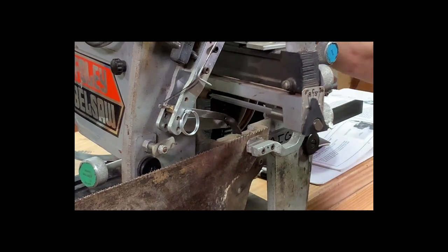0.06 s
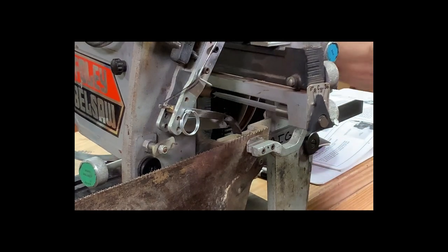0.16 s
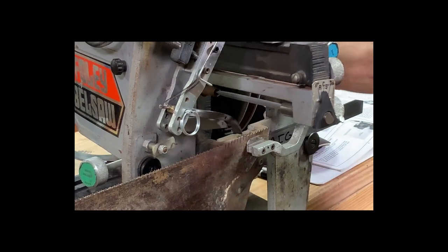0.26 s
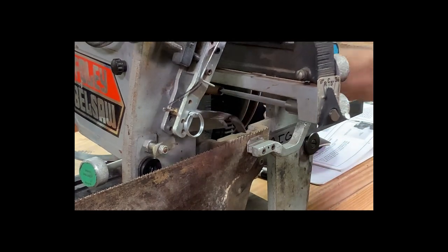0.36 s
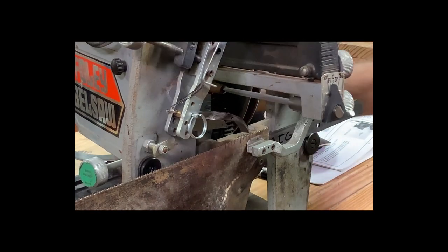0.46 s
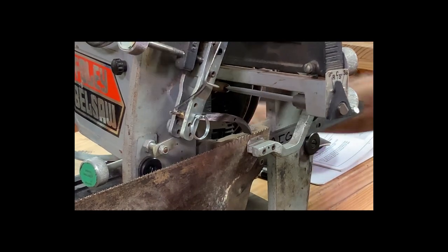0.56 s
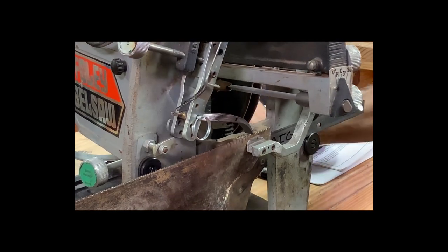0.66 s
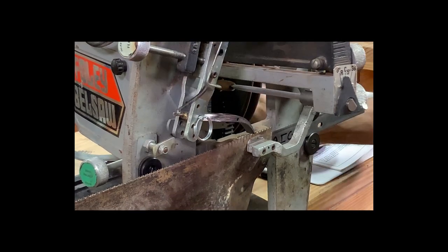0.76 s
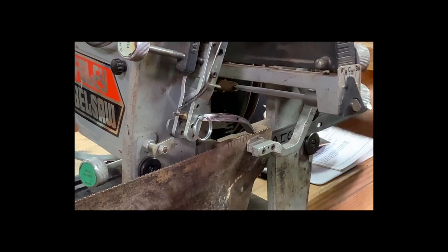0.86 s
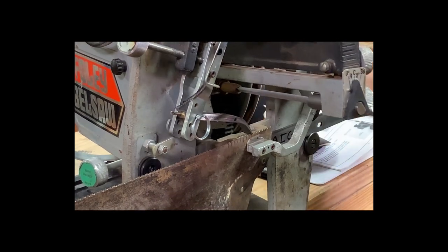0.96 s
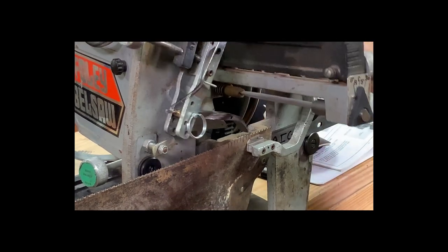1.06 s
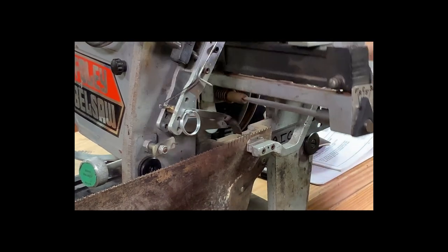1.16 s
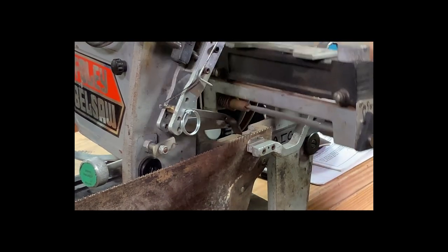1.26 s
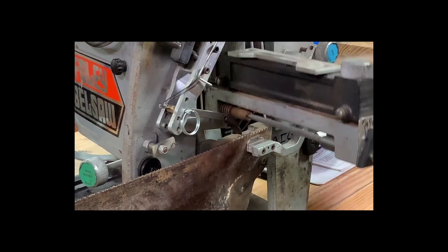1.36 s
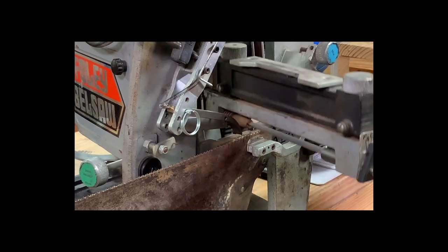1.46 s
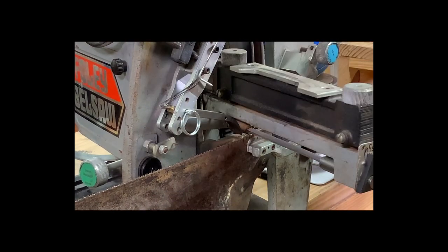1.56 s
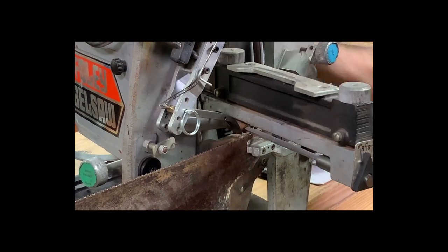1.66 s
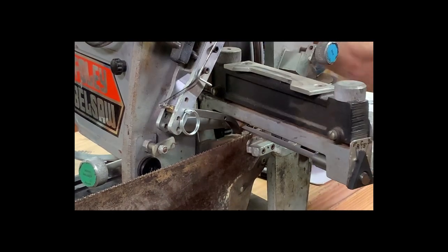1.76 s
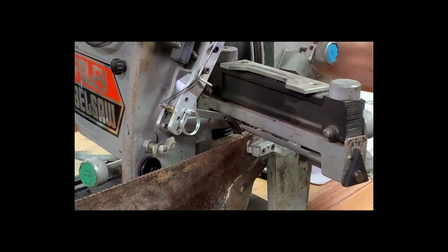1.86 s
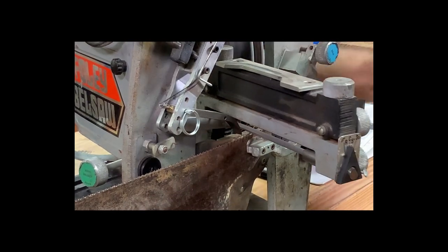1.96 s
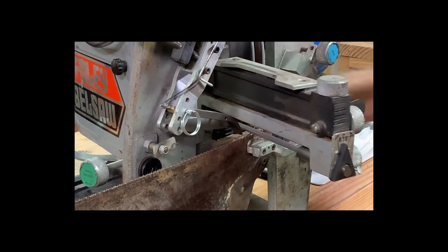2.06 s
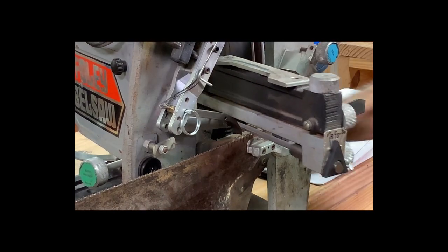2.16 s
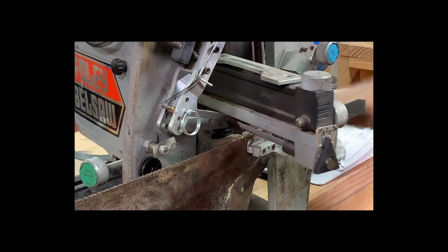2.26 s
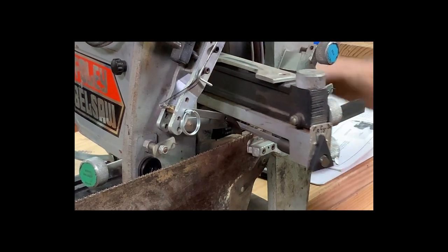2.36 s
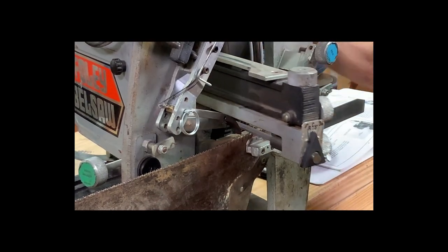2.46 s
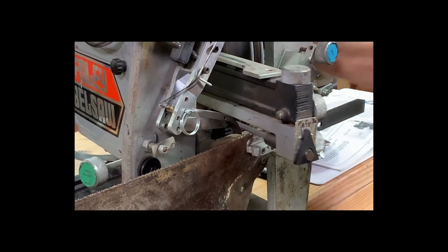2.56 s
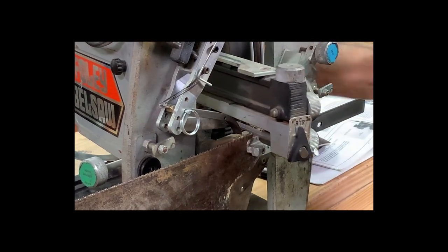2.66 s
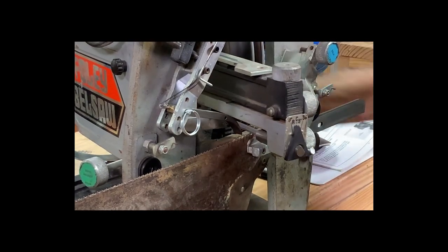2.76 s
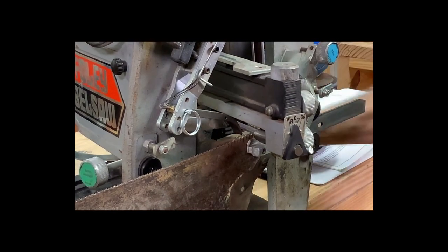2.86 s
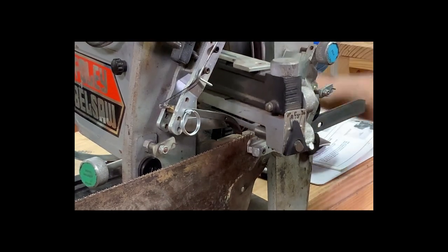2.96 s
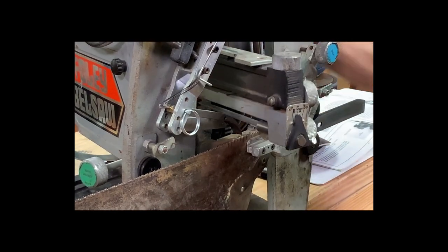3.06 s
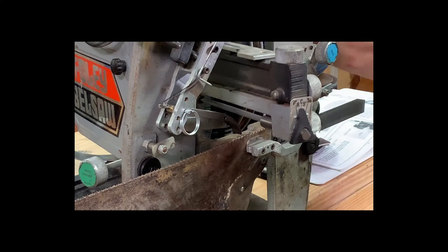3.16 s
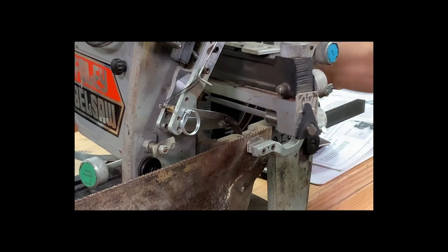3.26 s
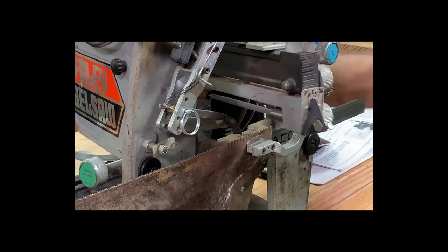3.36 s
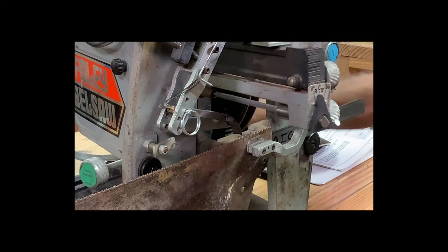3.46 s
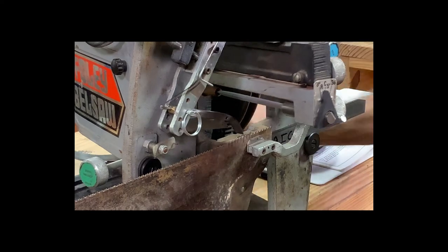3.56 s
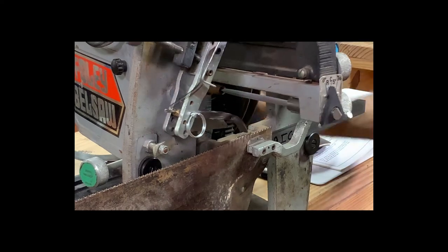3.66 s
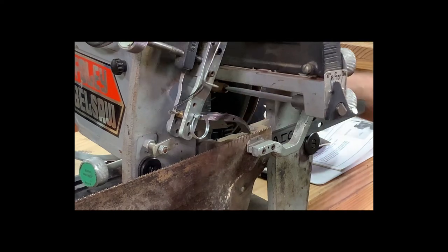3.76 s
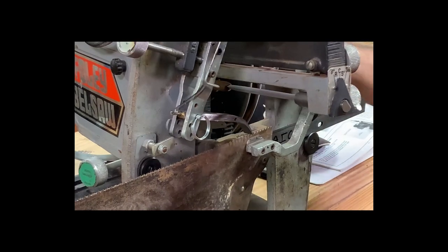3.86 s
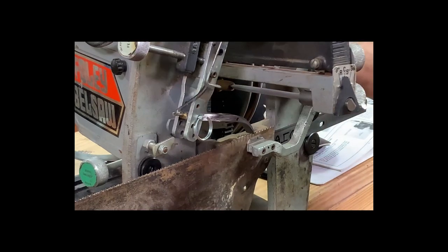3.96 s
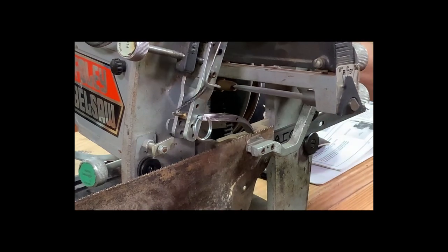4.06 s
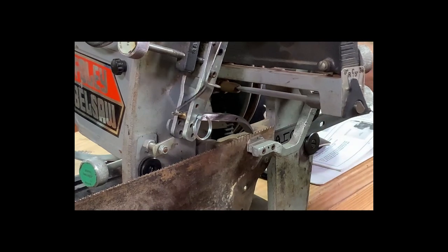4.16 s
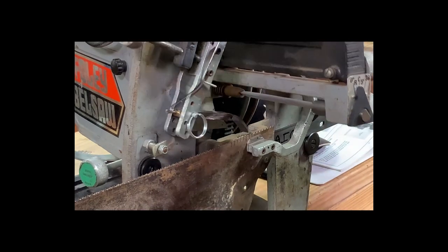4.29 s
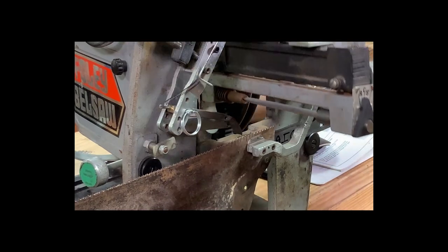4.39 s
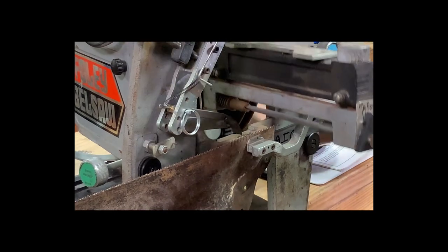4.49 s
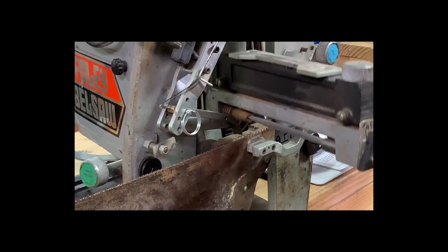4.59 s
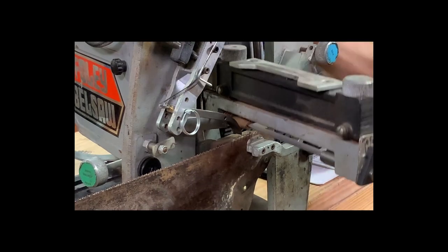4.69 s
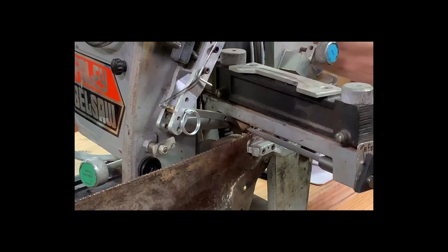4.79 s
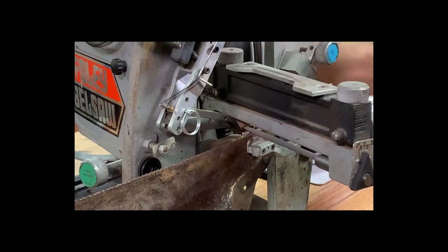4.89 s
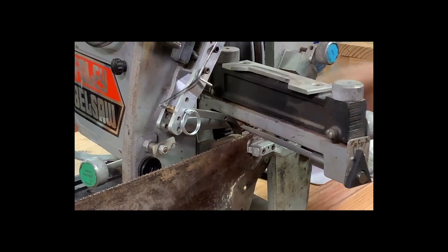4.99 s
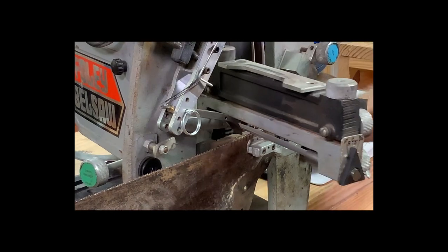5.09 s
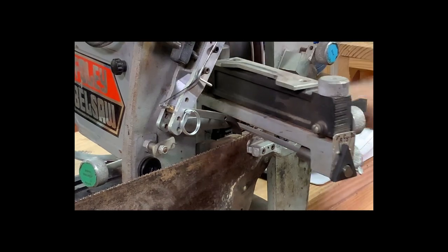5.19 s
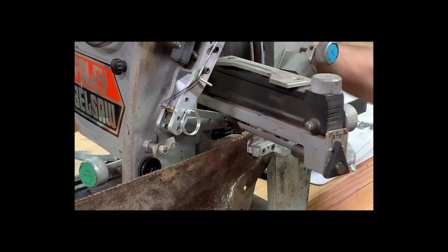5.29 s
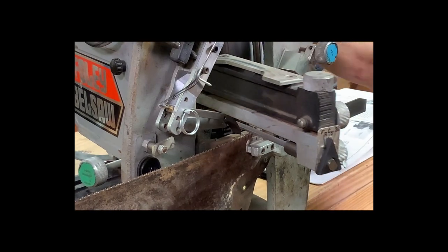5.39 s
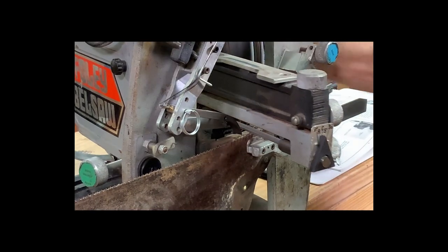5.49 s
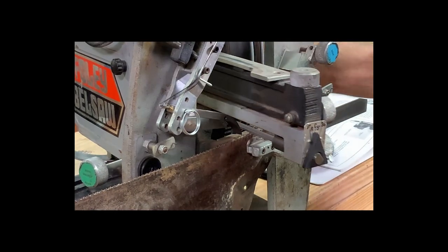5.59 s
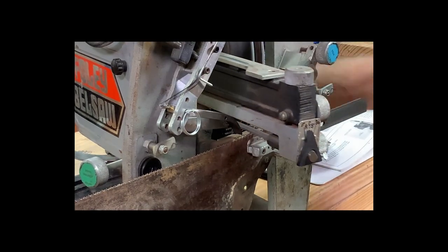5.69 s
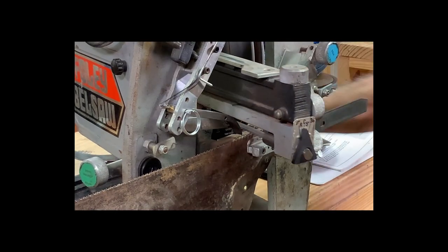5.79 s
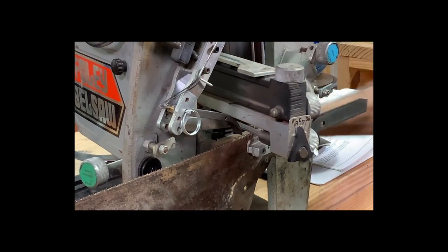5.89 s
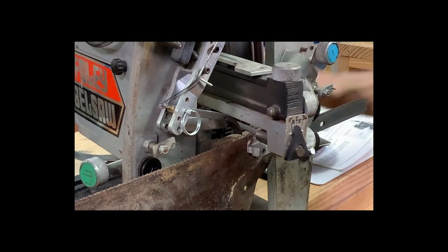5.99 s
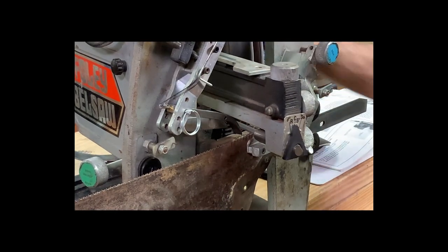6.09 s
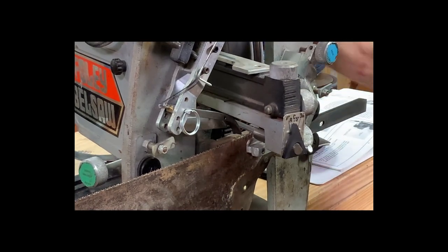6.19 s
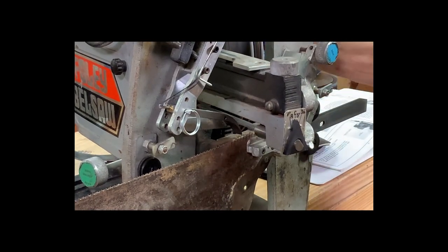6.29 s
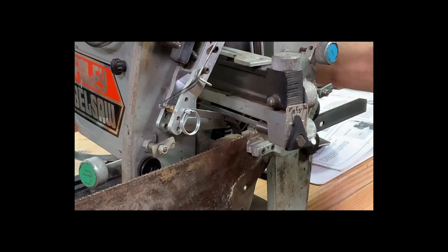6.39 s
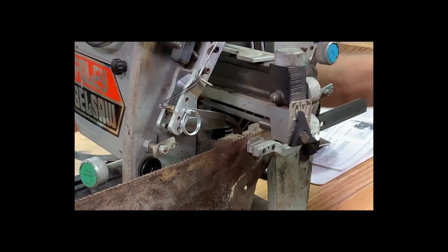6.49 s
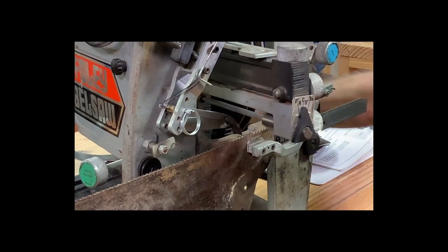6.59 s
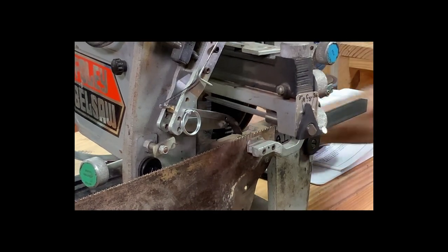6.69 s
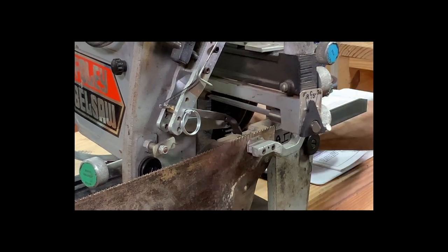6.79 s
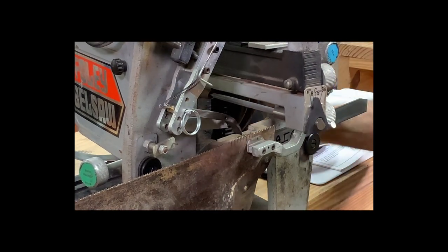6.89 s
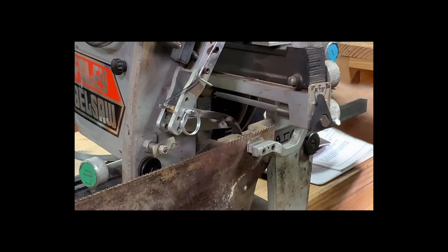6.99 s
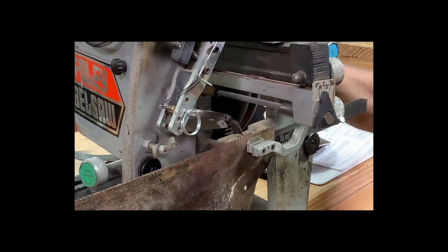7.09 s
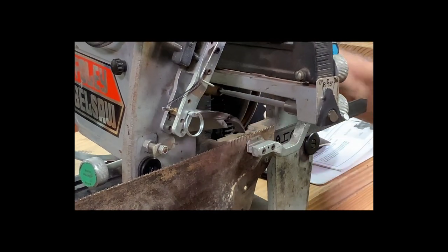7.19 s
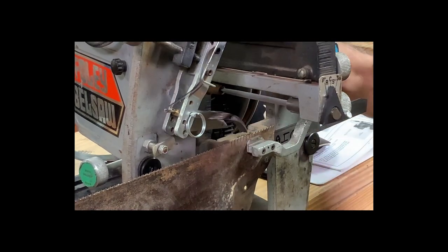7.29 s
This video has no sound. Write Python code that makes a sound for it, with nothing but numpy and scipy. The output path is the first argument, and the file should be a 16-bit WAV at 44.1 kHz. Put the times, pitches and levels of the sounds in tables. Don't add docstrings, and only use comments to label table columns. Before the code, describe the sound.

Dull crank knocks and bright steel clicks lead into a loud scraping file stroke on an old saw, lasting just over a second and broken into gritty bites, snaps and thin shrieks. After a quieter stretch of hum, gears and pawl ticks, another similar stroke follows, then fades to hum and a few soft knocks. Close stereo pickup in a lightly reverberant workshop, with automatic level ducking.

```python
import sys
import numpy as np
from scipy import signal
from scipy.fft import rfft, irfft, next_fast_len
from scipy.io import wavfile
from scipy.ndimage import uniform_filter1d

SR = 44100
rng = np.random.default_rng(int(sys.argv[2]) if len(sys.argv) > 2 else 0)


def bounce(signal):
    frames = np.transpose(np.atleast_2d(signal))
    limited = np.clip(frames, -1, 1)
    pcm = np.round(limited * 32767).astype(np.int16)
    wavfile.write(sys.argv[1], SR, pcm)


def nominal_scale(level):
    x = np.asarray(level, float) / 20
    return 10 ** x


N = 323880

# file down in seconds, file up in seconds.
STROKES = [
    (1.654, 2.9),
    (4.838, 6.16),
]


def column(rows, t):
    s, *rest = np.transpose(rows)
    return [np.interp(t, s, c) for c in rest]


def rms_one(x):
    return x / np.sqrt(np.mean(x ** 2) + 1e-20)


def band(x, low_hz, high_hz, order=2):
    sos = signal.butter(order, [low_hz, min(high_hz, SR / 2.3)], "band", fs=SR, output="sos")
    return signal.sosfilt(sos, x)


def drift(rate_hz, size=N):
    r = np.exp(-2 * np.pi * rate_hz / SR)
    settle = 8000
    noise = rng.standard_normal(size + settle)
    return rms_one(signal.lfilter([1], [1, -2 * r, r * r], noise)[settle:])


def resonate(x, hz, width_hz):
    r = np.exp(-np.pi * width_hz / SR)
    poles = [1, -2 * r * np.cos(2 * np.pi * hz / SR), r * r]
    return signal.lfilter([(1 - r * r) / 2, 0, (r * r - 1) / 2], poles, x)


def grit(per_s, spread_db):
    sizes = nominal_scale(spread_db * np.minimum(rng.exponential(1, N), 5)) * rng.choice([-1, 1], N)
    return rms_one(sizes * (rng.random(N) < per_s / SR))


def burst(s, crack_s, t60, tail_db):
    t = np.arange(round(.15 * SR)) / SR
    return round(s * SR), np.exp(-t / crack_s) + nominal_scale(tail_db - 60 * t / t60)


def patchy(x, patch_db):
    _, _, z = signal.stft(x, SR, nperseg=512)
    patches = uniform_filter1d(rng.standard_normal(z.shape), size=11, axis=0)
    patches = uniform_filter1d(patches, size=7, axis=1)
    return signal.istft(z * nominal_scale(patch_db * rms_one(patches)), SR, nperseg=512)[1][:N]


def ducking_db():
    # time in seconds, gain in dB.
    peaks = [
        (1.982, -11),
        (2.46, -9),
        (5.243, -12.5),
        (5.85, -12),
    ]
    fall_s, hold_s, recover_db_per_s, resting_db = 0.015, 0.12, 2, -2.1
    since = np.arange(N) / SR - np.array(peaks)[:, :1]
    depth = np.array(peaks)[:, 1:] + recover_db_per_s * np.maximum(since - hold_s, 0)
    gains = depth * np.clip(since / fall_s, 0, 1)
    return np.minimum(np.min(gains, axis=0), resting_db)


def motor_and_air():
    # frequency in Hz, density in dB per Hz.
    air = [(33, -49), (52, -7), (100, 3), (200, -1), (400, -6), (700, -14.5), (1300, -19.5), (2000, -26),
           (3000, -27.5), (5500, -37), (9000, -34.5), (12000, -53), (16000, -49.5)]
    # frequency in Hz, level in dB, wander in Hz.
    lines = [(58.9, -39.5, 1.5), (119.9, -31, 0.58), (154.5, -39.5, 2.5), (188.8, -39.5, 1.75),
             (275, -57, 3), (359, -49, 3.914), (746, -55, 26), (1345, -56.5, 60.0)]
    size = next_fast_len(N)
    hz = np.fft.rfftfreq(size, 1 / SR)
    density_db = column([(np.log(f), d) for f, d in air], np.log(hz + 1))[0]
    murmur = irfft(rfft(rng.standard_normal(size)) * nominal_scale(density_db), size)[:N]
    out = nominal_scale(-33) * rms_one(patchy(murmur, patch_db=1.35))
    for line_hz, db, wander_hz in lines:
        phase = 2 * np.pi * np.cumsum(line_hz + wander_hz * drift(8 + wander_hz)) / SR
        waver_db = min(0.8 + 0.096 * wander_hz, 2.5) * drift(5 + 0.71 * wander_hz)
        out += nominal_scale(db + waver_db) * np.sqrt(2) * np.sin(phase)
    return out


def gearing():
    teeth_per_s, tick_db, case_db = 14, -44.5, -48
    turned = np.cumsum(teeth_per_s * nominal_scale(2.5 * drift(3))) / SR
    meets = np.diff(np.floor(turned), prepend=0) * nominal_scale(3.2 * rng.standard_normal(N))
    puff = signal.lfilter([1], [1, -.992], meets) * rng.standard_normal(N)
    blow = signal.lfilter([1], [1, -.998], meets) * rng.standard_normal(N)
    case = resonate(blow, 1340, 110)
    return nominal_scale(.5 * ducking_db()) * (nominal_scale(tick_db) * band(puff, 4200, 9500) + nominal_scale(case_db + 20.5) * case)


def crank():
    # time in seconds, peak in dB, ringing in Hz.
    knocks = [(0.064, -30, 754), (0.139, -30.5, 738), (0.169, -33, 668), (0.385, -51, 503),
              (0.791, -34.5, 554), (1.165, -31, 1280), (3.174, -40, 834), (3.998, -31, 501),
              (6.849, -42, 565), (6.949, -40, 580)]
    out = np.zeros(N)
    for s, db, hz in knocks:
        i, shape = burst(s, crack_s=0.017, t60=0.19, tail_db=-5.5)
        soft = uniform_filter1d(shape, size=200, mode="constant")
        noise = soft * rng.standard_normal(len(shape))
        out[i:i + len(shape)] += nominal_scale(db - 5.0) * (band(noise, 290, 1820) + 3.0 * resonate(noise, hz, 220))
    return out


def carriage():
    slide_db, swing_db, swing_s, slowing_db_per_s = -53, 6.5, 0.4, 0.88
    t = np.arange(N) / SR
    swing = sum(np.clip((t - down + swing_s) / 0.12, 0, 1) * (t < up) for down, up in STROKES)
    level_db = slide_db + swing_db * swing + 0.42 * ducking_db()
    level_db += 2.0 * drift(20) - slowing_db_per_s * t
    return nominal_scale(level_db) * rms_one(band(grit(5000, spread_db=3.0), 2200, 13300, order=1))


def linkage():
    # time in seconds, peak in dB, ringing in Hz, top octave re peak in dB.
    ticks = [(0.337, -25.5, 3670, -37), (0.383, -31, 4840, -18.5), (0.967, -14.5, 13700, -3.5),
             (1.036, -15, 3890, -3), (1.0765, -24, 7550, -15), (1.185, -30, 5630, -15),
             (1.2474, -25.5, 9300, -1), (3.5893, -27.5, 5050, -37), (3.6287, -35.5, 4540, -20),
             (3.9994, -32, 6060, -17), (4.1586, -22.5, 5030, -17), (4.2382, -17.5, 5420, -8),
             (4.2794, -48, 4630, -16), (4.4483, -32, 9710, 2), (4.7763, -46, 8190, 3),
             (7.1372, -38, 4200, -28)]
    out = np.zeros(N)
    for s, db, hz, top_db in ticks:
        i, shape = burst(s, crack_s=.002, t60=.095, tail_db=-8.0)
        noise = shape * rng.standard_normal(len(shape))
        tick = band(noise, 1550, 8600)
        tick -= nominal_scale(top_db + 3.5) * band(noise, 9500, 19000)
        tick -= 0.36 * band(noise, 500, 2200, order=1)
        tick += 2.0 * resonate(noise, hz, 110)
        out[i:i + len(shape)] += (nominal_scale(db - 8) * tick)[:N - i]
    return out


def pressure():
    # start in seconds, length in seconds, grit in dB, body re grit in dB.
    bites = [(1.669, 0.018, -33.5, -7), (1.72, 0.087, -35.5, 2), (1.803, .17, -30, -2),
             (2.03, 0.018, -29, -10.5), (2.067, 0.072, -33, -4.5), (2.11, 0.036, -33, -4.5),
             (2.242, 0.14, -25, -7), (2.403, 0.12, -28, -16.5), (2.555, 0.063, -33, -9),
             (2.64, 0.085, -36, -9.5), (2.77, 0.098, -44, -13), (4.885, 0.056, -35.5, -0.5),
             (4.985, 0.074, -27.5, -4), (5.076, 0.061, -33.5, 0), (5.16, 0.038, -28.5, -7.5),
             (5.193, 0.058, -34, -1), (5.227, 0.025, -24.5, -21), (5.376, 0.046, -26.5, -11),
             (5.429, 0.062, -29, -5), (5.498, .11, -32.5, -13.5), (5.655, 0.042, -32.5, -19.5),
             (5.726, 0.024, -31.5, -10), (5.814, 0.066, -35, -10), (5.884, 0.059, -36.5, -7),
             (6.014, 0.039, -65, -1), (6.094, 0.032, -60, 21.5)]
    attack_s, release_s = 0.015, 0.026
    blade_share, blade_db, vice_db = .6, 0, -2.5
    t = np.arange(N) / SR
    touching = sum(np.clip((t - down) / 0.017, 0, 1) * np.clip((up - t) / 0.033, 0, 1)
                   for down, up in STROKES)

    def spread(db, body_db):
        return nominal_scale(db + np.array([[0], [blade_db + blade_share * body_db], [vice_db + body_db]]))

    power = (touching * spread(-43.5, -1.5)) ** 2
    for s, length, db, body_db in bites:
        x = np.arange(round(.3 * SR)) / SR
        shape = np.clip(x / attack_s, 0, 1) * np.exp(-np.maximum(x - length, 0) / release_s)
        i = round(s * SR)
        power[:, i:i + len(x)] += (shape * spread(db, body_db)) ** 2
    frame = touching * nominal_scale(-33.5 + 1.26 * ducking_db())
    return [*np.sqrt(power), frame]


def file_strokes():
    # frequency in Hz, width in Hz, level in dB.
    blade = [(1290, 51, 4), (1570, 38, 5.5), (1980, 330, 4), (3670, 440, -0.5), (4164, 81, 3.5),
             (4280, 70, -25), (8930, 900, 2.5), (9800, 640, 4), (11100, 1400, 8), (12400, 800, 9),
             (14050, 600, 9), (14300, 249.7, -11.5), (15240, 320, -4)]
    teeth = grit(9000, spread_db=1.5) * nominal_scale(1.0 * drift(52) + 1.9 * drift(300))
    modes = sum(nominal_scale(db + 3.6 * drift(8.65)) * resonate(teeth, hz, w) for hz, w, db in blade)
    body = patchy(teeth + nominal_scale(-3) * modes, patch_db=2.5)
    edges_hz = [19000, 5000, 2600, 750, 70]
    out = np.zeros(N)
    for k, (gain, wide_db) in enumerate(zip(pressure(), [4.78, 2.4, 0.22, 0.57])):
        region = (-1) ** k * rms_one(band(body, edges_hz[k + 1], edges_hz[k]))
        out += gain * nominal_scale(wide_db) * region
    return out


def tooth_catches():
    # time in seconds, peak in dB.
    catches = [(1.6846, -12), (1.7235, -10.5), (1.9602, -5), (2.0418, -20), (2.246, -5), (2.662, -15),
               (2.785, -37), (2.8306, -16.5), (2.8517, -13.5), (4.8551, -40), (4.8854, -11), (5, -13.5),
               (5.173, -9), (5.4022, -12.5), (5.4505, -25), (5.7362, -26), (6.0541, -35), (6.1005, -17.5),
               (6.138, -27)]
    out = np.zeros(N)
    for s, db in catches:
        i, shape = burst(s, crack_s=.003, t60=.1, tail_db=-10.0)
        noise = band(rng.standard_normal(len(shape)), 1800, 19000)
        out[i:i + len(shape)] += nominal_scale(db - 10.5) * shape * noise
    return out


def squeals():
    # start in seconds, length in seconds, pitch in Hz, level in dB.
    rough = [(1.791, 0.043, 11150, -30), (1.862, 0.043, 15350, -11.5), (5.639, .041, 15000, -27),
             (5.874, 0.029, 11950, -24.5), (2.119, 0.074, 11050, -28.5), (2.156, .017, 11430, -14),
             (2.261, 0.071, 4100, -26.5), (2.351, 0.044, 4310, -25), (2.363, 0.044, 11020, -21.5),
             (2.472, 0.051, 4880, -22.5), (2.569, 0.023, 4070, -24), (2.659, .03, 11250, -19),
             (4.997, 0.14, 4420, -27.5), (5.015, 0.048, 3190, -23), (5.241, .029, 11070, -8),
             (5.517, 0.037, 10870, -12.5)]
    # start in seconds, length in seconds, pitch in Hz, level in dB.
    whistles = [
        (1.968, 0.037, 13810, -7.5),
        (2.035, .06, 13830, -33),
        (2.298, 0.044, 7720, -22),
        (4.99, 0.11, 1245, -31.5),
        (5.629, 0.079, 5015, -21),
    ]
    # start and length in seconds, start and end in Hz, level in dB.
    slides = [
        (2.412, 0.08, 11500, 10970, -16),
        (2.458, 0.083, 10550, 8950, -24.5),
        (2.508, 0.048, 4500, 4370, -22.5),
        (5.283, .027, 11800, 10940, -16),
        (5.569, .084, 11430, 11100, -13.5),
        (5.835, 0.041, 10730, 11470, -11.5),
        (5.914, .043, 13100, 13580, -20),
    ]
    rows = [(s, length, hz, hz, 246.7, db) for s, length, hz, db in rough]
    rows += [(s, length, hz, hz, 0.0068 * hz, db) for s, length, hz, db in whistles]
    rows += [(s, length, hz, end_hz, 340, db) for s, length, hz, end_hz, db in slides]
    out = np.zeros(N)
    for s, length, start_hz, end_hz, flutter_hz, db in rows:
        x = np.arange(round(length * SR * 2)) / (length * SR)
        decay_db = -8 * np.minimum(x, 1) ** 2 - 60 * np.maximum(x - 1, 0)
        swell = np.clip(x * length / .011, 0, 1) * nominal_scale(decay_db)
        phase = 2 * np.pi * np.cumsum(start_hz + (end_hz - start_hz) * np.minimum(x, 1)) / SR
        wobble = drift(flutter_hz, size=len(x)) + 1j * drift(flutter_hz, size=len(x))
        flutter = 0.8 + 0.54 * wobble
        i = round(s * SR)
        out[i:i + len(x)] += nominal_scale(db) * swell * np.real(flutter * np.exp(1j * phase))
    return out


def echoes(x, t60, dull_hz):
    t = np.arange(round(t60 * SR)) / SR
    tail = band(rng.standard_normal(len(t)), 45, dull_hz, order=1) * nominal_scale(-60 * t / t60)
    return signal.fftconvolve(x, tail / np.sqrt(np.sum(tail ** 2)))[:N]


def scene():
    machine = file_strokes() + tooth_catches() + carriage() + linkage() + crank() + gearing()
    tones = squeals()
    duck = nominal_scale(ducking_db())
    shop = duck * echoes((machine + .5 * tones) / duck, .75, dull_hz=15000)
    front = machine + tones + nominal_scale(-9.5) * shop + duck * motor_and_air()
    return np.array([front, echoes(front, .2, dull_hz=19000)])


def starve(mid, side, mid_db, side_db, waver_db, jump_db):
    frames = dict(window="cosine", nperseg=2048, noverlap=1024)
    hz, _, (m, s) = signal.stft(np.array([mid, side]), SR, **frames)
    group = np.searchsorted(np.geomspace(2050, 16600, 32), hz)
    starts = np.unique(group, return_index=True)[1]
    mid_power, side_power = [np.add.reduceat(abs(z) ** 2, starts) + 1e-20 for z in (m, s)]
    ratio_db = 10 * np.log10(mid_power / side_power)
    waver = uniform_filter1d(rng.standard_normal(ratio_db.shape), size=3)
    ratio_db = (ratio_db + waver_db * waver)[group]
    treble_db = 10 * np.log10(side_power[1:].sum(axis=0))
    thrifty = (group > 0)[:, None] & (np.diff(treble_db, prepend=0) < jump_db)
    m = m * ~(thrifty & (ratio_db < mid_db))
    s = s * ~(thrifty & (ratio_db > -side_db))
    return signal.istft(np.array([m, s]), SR, **frames)[1][:, :N]


def roll_off(x):
    return signal.sosfilt(signal.butter(12, 16780, fs=SR, output="sos"), x)


def record(dry):
    # frequency in Hz, left lead in radians, left-right in dB, diffuse share in dB.
    responses = [(110, 0, 0, -36), (330, 0, 1.2, -13), (600, .5, 2.2, -7), (900, .9, 2, -6.5),
                 (1400, .9, 1, -6.5), (1800, -.5, -1, -6.5), (2350, -2.3, -1, -9), (2750, -3.14, 0, -18),
                 (3150, -3.95, 0, -15), (4150, -5.8, 0, -15), (5300, -5.65, 0, -13), (6100, -6.2, 0, -17),
                 (7300, -5.15, 0, -11), (8700, -6.3, 0, -17), (16000, -7.25, 0, -11)]
    size = next_fast_len(N + 2048)
    log_hz = np.log(np.fft.rfftfreq(size, 1 / SR) + 1)
    turn, lean_db, diffuse_db = column([(np.log(p[0]), *p[1:]) for p in responses], log_hz)
    front, around = rfft(dry, size)
    sign = np.array([[1], [-1]])
    ports = front + sign * nominal_scale(diffuse_db) * around
    ports = ports * nominal_scale(sign * lean_db / 2) * np.exp(.5j * sign * turn)
    low_pass = signal.ellip(8, .5, 35, 15850, fs=SR, output="sos")
    left, right = signal.sosfilt(low_pass, irfft(ports, size)[:, :N])
    mid, side = starve((left + right) / 2, (left - right) / 2,
                       mid_db=-7.5, side_db=-11.5, waver_db=3.5, jump_db=6.0)
    rounded = 1.3 * np.tanh((mid + sign * side) / 1.3)
    return roll_off(rounded)


dry = scene()
out = record(dry)
bounce(out)
```